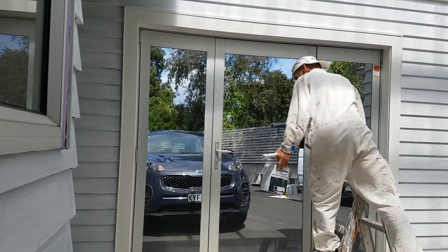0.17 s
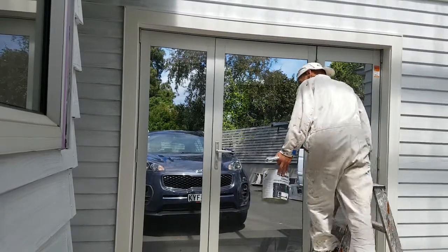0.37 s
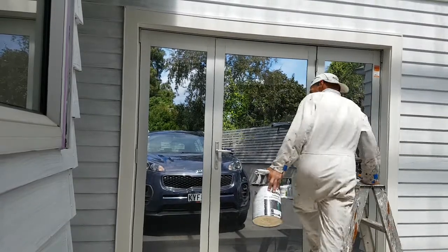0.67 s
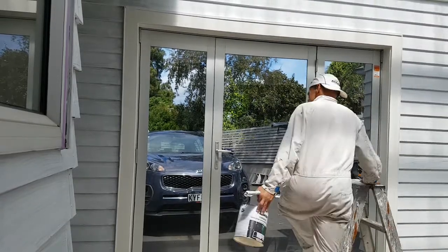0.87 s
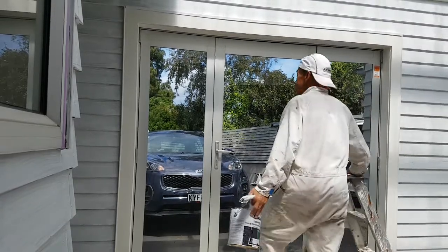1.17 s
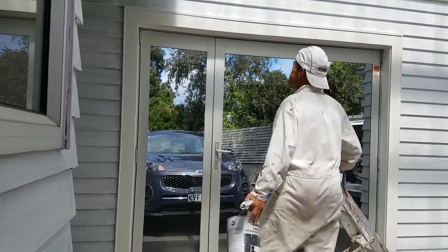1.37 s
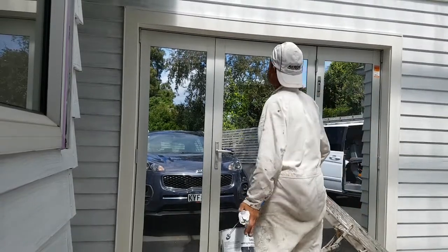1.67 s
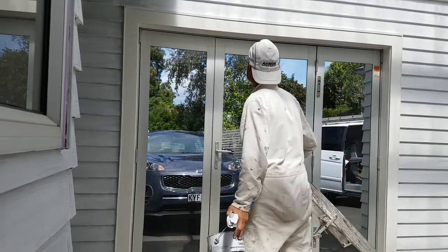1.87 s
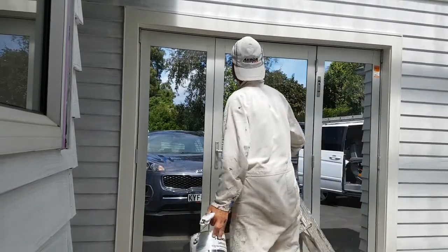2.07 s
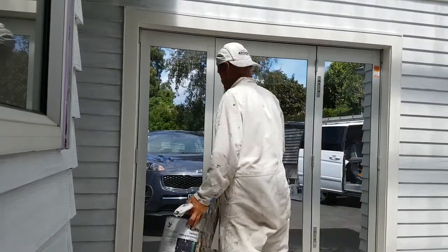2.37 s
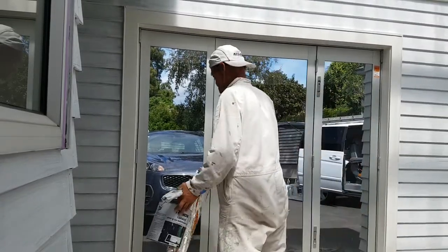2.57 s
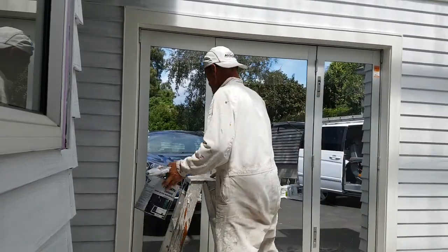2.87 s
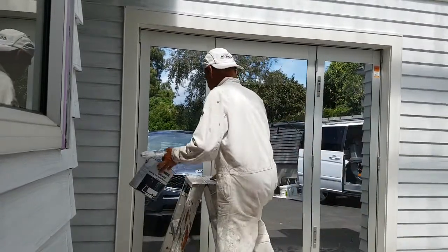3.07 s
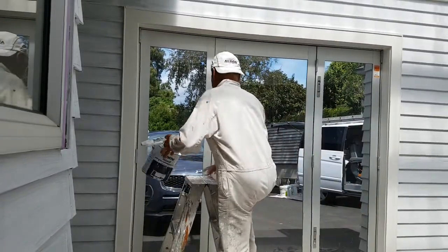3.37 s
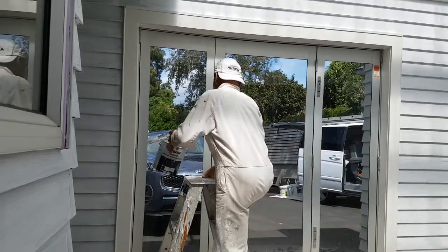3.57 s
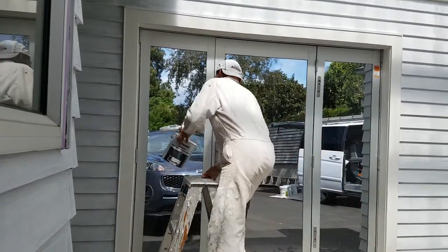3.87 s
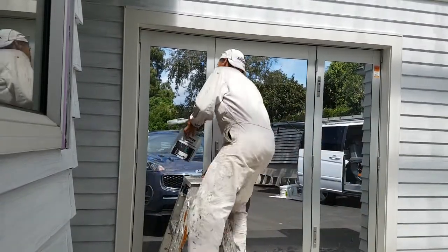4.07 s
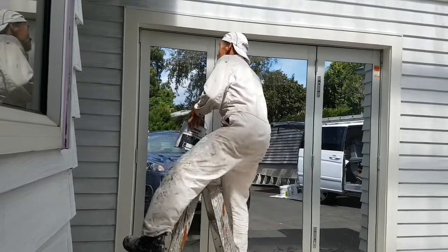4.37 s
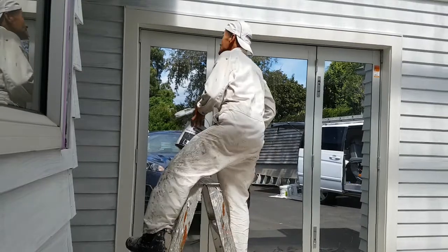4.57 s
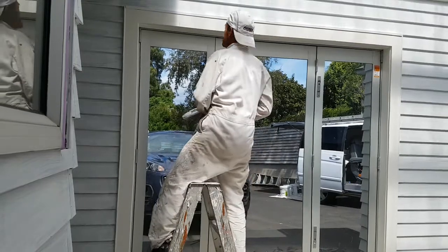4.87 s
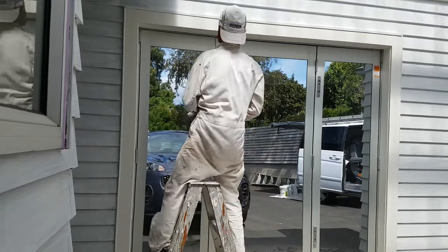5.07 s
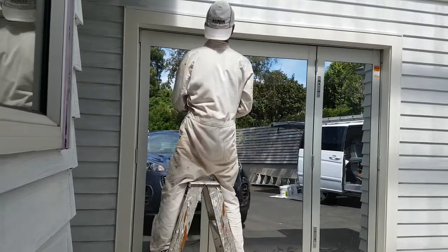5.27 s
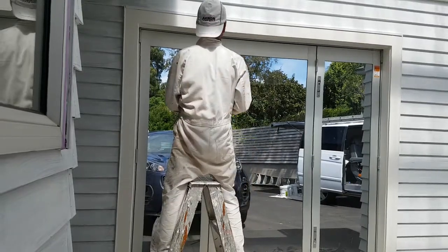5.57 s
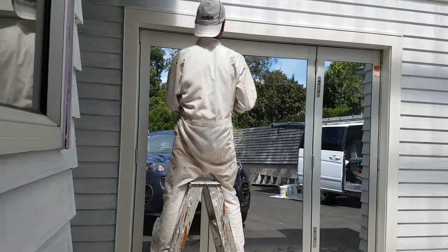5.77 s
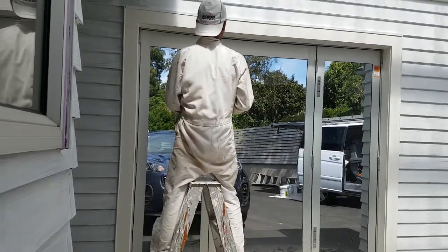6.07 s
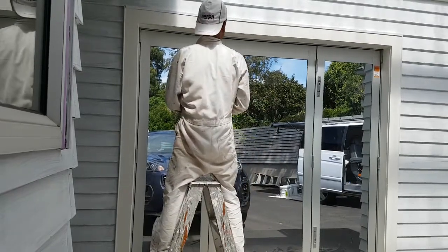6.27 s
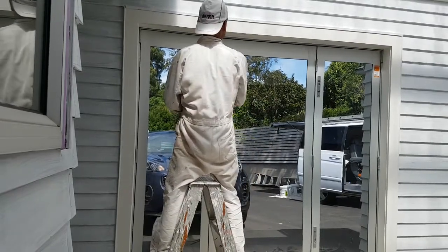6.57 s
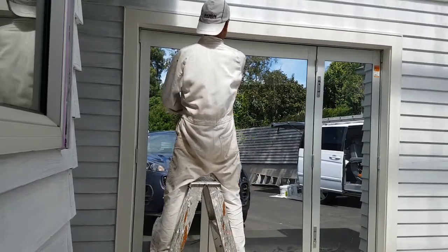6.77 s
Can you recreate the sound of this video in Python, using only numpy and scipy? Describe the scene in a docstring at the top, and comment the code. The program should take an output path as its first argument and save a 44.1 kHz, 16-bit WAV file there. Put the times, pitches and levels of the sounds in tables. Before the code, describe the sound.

Outside a house, a stepladder groans, rubs and knocks, lands with one loud sharp clack, then bumps lightly and gives a brief squeaky scrape.

```python
"""A groan of the loaded frame comes first, then rubs and bumps as a painter steps off a stepladder.
He drags it along a house wall and sets it down hard in a ringing paved yard, then climbs back on with light
knocks and dull bumps; a quick squealing scrape follows. A faint outdoor rumble and hiss lie underneath.
Blows excite decaying modes and a noisy clack, rubs are random tiny contacts, and squeaks are stick-slip
pulses; yard echoes place the sources around two differently coloured microphones."""
import sys
import numpy as np
from scipy import signal
from scipy.fft import rfft, irfft, next_fast_len
from scipy.io import wavfile

SR = 44100
rng = np.random.default_rng(int(sys.argv[2]) if len(sys.argv) > 2 else 0)


def wav_record(signal):
    """Record a signal, one row per channel, as 16-bit PCM in the file named by sys.argv[1]."""
    frames = np.transpose(np.atleast_2d(signal))
    bounded = np.clip(frames, -1, 1)
    # unit amplitude maps onto the largest positive 16-bit level
    quanta = np.round(bounded * 32767).astype(np.int16)
    wavfile.write(sys.argv[1], SR, quanta)


N = 304631
TIME = np.arange(N) / SR
CUTOFF_HZ = 15750  # top of the recorded band

# how alike the two microphones hear the yard: (frequency [Hz], left-right correlation [-1 to 1])
LEFT_RIGHT_LIKENESS = [(100, 0.93), (250, 0.89), (500, 0.6), (1000, 0.15), (2000, 0), (15000, 0)]


def from_db(db):
    """Decibels to gain."""
    return 10 ** (np.asarray(db) / 20)


def rms_one(x):
    """Scale to an rms of 1."""
    return x / np.sqrt(np.mean(x ** 2) + 1e-20)


def unit_energy(x):
    """Scale a response to an energy of 1 per channel."""
    return x / np.sqrt(np.sum(x ** 2, axis=-1, keepdims=True) + 1e-20)


def decay_60_db(t, t60):
    """Exponential decay that falls by 60 dB in t60 seconds."""
    return np.exp(-np.log(1000) * t / t60)


def at_hz(points, hz):
    """Read a table on a log-frequency axis."""
    table_hz, values = np.transpose(points)
    return np.interp(np.log(np.maximum(hz, 1)), np.log(table_hz), values)


def colour(x, spectrum):
    """Causal (minimum-phase) filter with the given dB spectrum."""
    size = next_fast_len(x.shape[-1] + SR // 10, True)
    gain = from_db(at_hz(spectrum, np.fft.rfftfreq(size, 1 / SR)))
    cepstrum = irfft(np.log(gain), size)
    # fold the cepstrum forward in time: the response then starts at once
    cepstrum[1:size // 2] *= 2
    cepstrum[size // 2 + 1:] = 0
    response = np.exp(rfft(cepstrum))
    return irfft(rfft(x, size) * response, size)[..., :x.shape[-1]]


def soften(x, hz):
    """One-pole low-pass: a softer contact loses its treble."""
    r = np.exp(-2 * np.pi * hz / SR)
    return signal.lfilter([1 - r], [1, -r], x + 1e-18)


def contact(x, bright_hz):
    """A soft contact dulls the treble gently at first, then more steeply."""
    return soften(soften(x, bright_hz), 4 * bright_hz)


def through(x, response):
    """Play a mono signal through a stereo response."""
    return signal.fftconvolve(x[None], response, axes=-1)[:, :N]


def add(out, s, x):
    """Mix x in from time s."""
    at = max(round(s * SR), 0)
    out[at:at + len(x)] += x[:N - at]


def stereo_noise(size):
    """White noise, alike in both channels in the bass and unrelated in the treble."""
    mid, side = rfft(rng.standard_normal((2, size)))
    alike = np.clip(at_hz(LEFT_RIGHT_LIKENESS, np.fft.rfftfreq(size, 1 / SR)), -1, 1)
    shared = np.sqrt((1 + alike) / 2) * mid
    opposed = np.sqrt((1 - alike) / 2) * side * [[1], [-1]]
    return irfft(shared + opposed, size)


def outdoors():
    """Steady airy hiss over the slowly changing rumble of a distant engine, both coloured noise."""
    # hiss of the open air: (frequency [Hz], relative level per Hz [dB])
    air_colour = [(15, -41), (25, -17), (40, -1), (62, -5.5), (110, -6), (160, -3.5), (300, -8.5),
                  (420, -11.5), (750, -13), (1600, -18.5), (2800, -22), (4500, -27), (7000, -21),
                  (9000, -28), (15500, -37)]
    # engine rumble: (frequency [Hz], relative level per Hz [dB])
    rumble_colour = [(25, -46), (52, -21), (67, -1.5), (88, -9.5), (200, -17.5), (600, -41), (3000, -72.5)]
    # rumble of the distant engine: (time [s], level [dB])
    rumble_levels = [(0, -57), (.9, -59.5), (1.8, -57), (2.6, -65), (4, -66.5), (6.9, -68.5)]
    air_db = -57.57
    size = next_fast_len(N, True)
    air = rms_one(colour(stereo_noise(size), air_colour))[:, :N]
    rumble = rms_one(colour(stereo_noise(size), rumble_colour))[:, :N]
    rumble_db = np.interp(TIME, *np.transpose(rumble_levels))
    return from_db(air_db) * air + from_db(rumble_db) * rumble


def yard(direct_db, early_db, early_s):
    """Direct sound, a burst of echoes off the near walls, then a tail with its own decay in each band."""
    # ringing of the yard: (frequency [Hz], time to fall by 60 dB [s])
    yard_t60 = [(100, 0.4), (300, 0.53), (600, 0.79), (1500, 0.63), (3500, 0.81), (6000, 0.67),
                (10000, 0.54), (15000, 0.27)]
    t, hz = TIME[:SR], np.fft.rfftfreq(SR, 1 / SR)
    noise, response = rfft(stereo_noise(SR)), 0
    echoes = (1 + from_db(early_db) * np.exp(-t / early_s)) * (1 - np.exp(-t / 0.00023))
    edges = np.geomspace(200, 17000, 25) - 160
    for low, high in zip(edges, edges[1:]):
        band = irfft(noise * ((hz >= low) & (hz < high)), SR)
        decay = decay_60_db(t, at_hz(yard_t60, np.sqrt(low * high)))
        response = response + np.sqrt(high - low) * unit_energy(band * decay * echoes)
    response = unit_energy(response)
    response[:, 0] += from_db(direct_db)  # the direct sound arrives first, against the echoes
    return unit_energy(response)


def grit(size, per_s, spread_db):
    """Random tiny contacts of uneven strength."""
    touches = rng.random(size) < per_s / SR
    strengths = from_db(spread_db * rng.standard_normal(size))
    return rms_one(touches * rng.choice([-1, 1], size) * strengths)


def rubs(strokes, per_s, spread_db):
    """Sliding surfaces catch many times a second, swelling and fading."""
    force, t = np.zeros(N), TIME[:SR // 2] - 1 / 4
    for s, half_s, db, bright_hz in strokes:
        stroke = grit(len(t), per_s, spread_db) * np.exp(-(t / half_s) ** 2)
        after_start = s + t >= 0
        add(force, s + t[0], from_db(db) * contact(stroke, bright_hz)[after_start])
    return force


def overalls():
    """Swishes of the overalls: dense fine contacts in the cloth, filtered to its colour."""
    # swishes: (middle time [s], half length [s], relative level [dB], brightness [Hz])
    swishes = [(.228, 0.031, -45, 11900), (.5, 0.039, -44, 5970), (.84, 0.035, -48.5, 9000),
               (2.05, 0.016, -46.5, 9000), (2.22, 0.038, -44, 4980), (3.555, 0.031, -39.5, 10200),
               (4.24, .03, -50, 5900), (4.61, 0.084, -46, 3020), (6.35, 0.047, -55.5, 5020),
               (6.72, 0.2, -58.5, 3980)]
    # colour of the cloth: (frequency [Hz], gain [dB])
    cloth_colour = [(300, -6), (1200, -5.5), (2500, 3.5), (5000, -1.5), (8000, -6.5), (15000, -17.5)]
    return colour(rubs(swishes, per_s=2500, spread_db=1), cloth_colour)


def groans(waver):
    """Slow stick-slip in the loaded frame: a wavering tone and its octave."""
    # groans: (time [s], length [s], pitch [Hz], relative level [dB], octave against the tone [dB])
    frame_groans = [(0, 0.151, 259.8, -48.5, -10), (0.456, 0.11, 401.3, -44, -4)]
    out = np.zeros(N)
    for s, length_s, hz, db, octave_db in frame_groans:
        wobble = rms_one(soften(rng.standard_normal(SR), 68))[:round(length_s * SR)]
        phase = 2 * np.pi * np.cumsum(hz * (1 + waver * wobble)) / SR
        tone = np.sin(phase) + from_db(octave_db) * np.sin(2 * phase)
        add(out, s, from_db(db) * rms_one(tone) * signal.windows.tukey(len(tone), 1 / 4))
    return out


def damped(hz, t60):
    """A quickly damped tone with a soft start."""
    t = TIME[:SR // 2]
    return np.sin(2 * np.pi * hz * t) * decay_60_db(t, t60) * (1 - np.exp(-t / 0.00093))


def click(fall_s):
    """The brief dull click of a contact: coloured noise dying away."""
    # dull click of a sole or foot: (frequency [Hz], relative level [dB])
    click_colour = [(60, -34.5), (200, -11.5), (800, 2), (1400, -2), (2500, -11.5), (3500, -28.5),
                    (8000, -38)]
    t = TIME[:SR // 2]
    return rms_one(colour(rng.standard_normal(len(t)), click_colour)) * np.exp(-t / fall_s)


def thud():
    """The low thud of weight settling: bass noise that rises softly and dies away."""
    # weight settling: (frequency [Hz], relative level [dB])
    thud_colour = [(30, -42.5), (70, -10), (120, 0), (200, -5), (280, 0.5), (450, -14.5), (2000, -59.5)]
    rise_s, fall_s = .012, .06
    t = TIME[:SR // 2]
    noise = rms_one(colour(rng.standard_normal(len(t)), thud_colour))
    return noise * (1 - np.exp(-t / rise_s)) * np.exp(-t / fall_s)


def bumps(click_s):
    """Each boot landing on a rung or the ground gives a damped tone, a dull click and a thud."""
    # landings: (time [s], relative level [dB], pitch [Hz], relative level of the low thud [dB])
    landings = [(.732, -24, 190, -36.5), (0.868, -28.5, 206, -45), (3.544, -28, 286, -46),
                (4.441, -41.5, 183, -57), (5.007, -29.5, 190, -48.5)]
    tone_t60_s, click_db = 0.038, -14.5  # click against the tone
    out = np.zeros(N)
    for s, db, hz, thud_db in landings:
        bump = damped(hz, tone_t60_s) + from_db(click_db) * click(click_s)
        add(out, s, from_db(db) * bump + from_db(thud_db) * thud())
    return out


def feet(click_s):
    """The ladder's feet ring briefly, with a click and a thud, each time they meet the paving."""
    # ring of the feet: (frequency [Hz], relative level [dB], time to fall by 60 dB [s])
    foot_modes = [(282.6, -24.5, 0.12), (451, -17.5, 0.25), (825, -16, 0.059), (1736, -6.5, 0.028)]
    # feet meeting the paving: (time [s], strength [dB], contact brightness [Hz])
    foot_hits = [(1.907, -22.5, 300), (2.982, 1.5, 5000), (5.883, -24.5, 394)]
    click_db, thud_db = -17, -50.5  # within each hit, before its strength
    out = np.zeros(N)
    ring = sum(from_db(db) * damped(hz, t60) for hz, db, t60 in foot_modes)
    for s, db, bright_hz in foot_hits:
        hit = ring + from_db(click_db) * click(click_s) + from_db(thud_db) * thud()
        add(out, s, from_db(db) * contact(hit, bright_hz))
    return out


def slips(slips_hz, uneven, jitter_hz, rolloff, grab_hz, grab_db, grab_bend):
    """Stick-slip pulses; a harder grip is louder and slips more slowly."""
    size = len(slips_hz)
    grip = rms_one(soften(soften(rng.standard_normal(SR), grab_hz), grab_hz))[-size:]
    jitter = rms_one(soften(rng.standard_normal(SR), jitter_hz))[-size:] - grab_bend * grip
    phase = 2 * np.pi * np.cumsum(slips_hz * (1 + uneven * jitter)) / SR
    orders = np.arange(1, 17)[:, None]
    weights = (orders * slips_hz < CUTOFF_HZ) / orders ** rolloff
    pulses = np.sum(weights * np.cos(orders * phase), axis=0)
    return rms_one(from_db(grab_db * grip) * pulses)


def scrape(grit_db, squeak_rolloff, rasp_rolloff):
    """Stick-slip squeaks that glide in pitch, over a gritty rasp that grows with the push and lets go."""
    # squeaks: (time [s], length [s], first slip rate [1/s], last slip rate [1/s], relative level [dB],
    #           unevenness [share of the slip rate])
    squeaks = [(5.062, 0.028, 1340, 2200, -43, 0.16), (5.108, 0.046, 5800, 5900, -50.5, .05),
               (5.143, .072, 1780, 2500, -49.5, 0.122), (5.219, 0.08, 4100, 4450, -43.5, .13),
               (5.278, .036, 2330, 2300, -35, 0.107), (5.306, .06, 2600, 5400, -36, 0.294),
               (5.361, .066, 6850, 7600, -32, 0.026), (5.419, .05, 2100, 1350, -32, 0.203)]
    # colour of the scrape: (frequency [Hz], gain [dB])
    scrape_colour = [(200, -9), (500, -10), (1000, -7.5), (2000, 1), (2700, -0.5), (4000, 1.5), (7300, -1),
                     (9000, -6.5), (14000, -3), (16000, -14)]
    squeak_fade = 0.29  # share of a squeak spent swelling and fading
    start_s, peak_s, end_s = 5.068, 5.5, 5.57  # the rasp
    peak_db, growth_db_per_s, fall_db_per_s = -37, 28.5, 39  # peak level before colouring
    rasp_slips_per_s, rasp_uneven = 1300, .7
    surface = dict(jitter_hz=2500, grab_hz=110, grab_db=4, grab_bend=.3)

    out = np.zeros(N)
    for s, length_s, first_hz, last_hz, db, uneven in squeaks:
        glide = np.geomspace(first_hz, last_hz, round(length_s * SR))
        swell = signal.windows.tukey(len(glide), squeak_fade)
        add(out, s, from_db(db) * swell * slips(glide, uneven, rolloff=squeak_rolloff, **surface))

    t = np.arange(start_s, end_s, 1 / SR) - peak_s
    push_db = peak_db + np.minimum(growth_db_per_s * t, -fall_db_per_s * t)
    push = from_db(push_db) * signal.windows.tukey(len(t), 1 / 20)
    rasp = slips(np.full(len(t), rasp_slips_per_s), rasp_uneven, rolloff=rasp_rolloff, **surface)
    rough = from_db(grit_db) * grit(len(t), per_s=1200, spread_db=0)
    add(out, start_s, push * (rasp + rough))
    return colour(out, scrape_colour)


def ladder_body(ring_db):
    """The lasting ring of the ladder: decaying sines, one for each mode."""
    # ring of the ladder: (frequency [Hz], relative level [dB], time to fall by 60 dB [s])
    ladder_modes = [(293, -7, 0.54), (448.6, 2, 0.48), (514, -7, 0.2), (623.4, -6.5, 0.67),
                    (822, -11, 0.31), (916, -3.5, 0.64), (976, -2.5, 0.53), (1067, -9, 0.1175),
                    (1258, -4, 0.46), (1420, -7.5, 0.87), (1702, 0, 0.261), (1752, -4.5, 0.36),
                    (1834, -5, 0.6), (1849, 0.5, 0.5), (1954, 3, 0.248), (1993, 3.5, 0.16),
                    (2108, -2, 0.41), (2110, -5.5, 0.69), (2450, -8, .58), (2530, -14.5, 0.17),
                    (3065, -6.5, 0.63), (2929, -7.5, 0.4), (3140, -11.5, 0.39), (3267, -7, 0.71),
                    (3630, -12, 0.88), (3817, -11, .5)]
    t, ring = TIME[:SR], 0
    for hz, db, t60 in ladder_modes:
        # higher modes reach the two microphones out of step
        alike = np.clip(at_hz(LEFT_RIGHT_LIKENESS, hz), -1, 1)
        apart = np.arccos(alike) / 2 * rng.choice([-1, 1])
        phase = 2 * np.pi * (hz * t + rng.random()) + apart * np.array([[1], [-1]])
        ring = ring + from_db(db) * np.sin(phase) * decay_60_db(t, t60)
    return from_db(ring_db) * unit_energy(ring * (1 - np.exp(-t / .003)))


def clack():
    """The broad clack of the frame heard across the yard; no two spots on the frame sound quite alike."""
    # short clack of the frame: (frequency [Hz], relative level per Hz [dB])
    clack_colour = [(60, -24), (130, -19), (200, -15.5), (280, -10.5), (365, -6), (460, 0), (700, -4.5),
                    (1000, -0.5), (1800, -0.5), (2450, -4), (3300, -2.5), (4400, -10), (6500, -9),
                    (9000, -15), (15000, -15)]
    return unit_energy(colour(yard(direct_db=-8, early_db=-4.5, early_s=0.0165), clack_colour))


def knocks(ring, count):
    """Blows land on a few spots in turn; the duller the contact, the longer the loose joints take to carry it."""
    # blows on the ladder: (time [s], strength [dB], contact brightness [Hz])
    blows = [(.82, -9.5, 2420), (1.054, -5.5, 2450), (1.137, 3, 1310), (1.36, -11.5, 1460),
             (1.735, -5, 1330), (1.794, -2.5, 393), (1.967, -14, 2980), (2.827, -8.5, 597),
             (2.9745, 6.5, 3530), (2.98, 16.5, 8750), (2.996, 20, 3720), (3.024, 10, 4020),
             (3.056, -4, 4000), (3.526, -0.5, 700), (3.541, 1.5, 730), (4.195, -14, 2516),
             (4.909, -9.5, 2530), (4.955, -12.5, 1210), (5.007, -6.5, 600), (5.256, -4.5, 800),
             (5.295, -9, 1000), (5.436, -0.5, 1300), (5.883, -21.5, 855)]
    build_1k_s, build_law = .004, 0.63  # build-up at 1 kHz brightness; power by which brighter blows build faster
    out, t = np.zeros((2, N)), TIME[:SR]
    spots = [clack() for _ in range(count)]
    for k, (s, db, bright_hz) in enumerate(blows):
        build_s = build_1k_s * (10 ** 3 / bright_hz) ** build_law
        response = (spots[k % count] + ring) * (1 - np.exp(-t / build_s))
        blow = from_db(db) * contact(response, bright_hz)
        add(out[0], s, blow[0])
        add(out[1], s, blow[1])
    return out


def ladder_sounds():
    """Knocks and rubs excite the clack and the lasting ring of one ladder."""
    # feet and frame rubbing: (middle time [s], half length [s], relative level [dB], contact brightness [Hz])
    ladder_rubs = [(.228, 0.023, -47.5, 3500), (.288, 0.031, -46.5, 1310), (.491, 0.043, -39, 1320),
                   (.63, 0.087, -47, 1280), (.987, 0.072, -42, 1160), (1.112, 0.02, -30, 770),
                   (1.18, 0.017, -30.5, 1120), (1.44, 0.061, -49, 1000), (1.745, 0.047, -39, 1320),
                   (2.031, 0.13, -47, 810), (2.34, .033, -56, 2546), (3.56, .012, -21.5, 504),
                   (4.16, 0.026, -51.5, 1473), (4.45, 0.043, -50, 1490), (5.485, 0.06, -32.5, 1680),
                   (6.885, 0.043, -50, 4040)]
    ring = ladder_body(ring_db=-5.5)
    rubbing = rubs(ladder_rubs, per_s=550, spread_db=4.5)
    rubbed = through(rubbing, clack() + from_db(0.5) * ring)
    return from_db(1.65) * (knocks(ring, count=5) + rubbed)


def scene():
    """Ladder, bumps, cloth and scrape in the yard, over the outdoor background."""
    near = yard(direct_db=9, early_db=0, early_s=.015)
    low = through(groans(waver=0.056) + bumps(click_s=0.011) + feet(click_s=.012), near)
    squeal = scrape(grit_db=-5, squeak_rolloff=0.96, rasp_rolloff=0.16)
    # less direct sound: these seem farther from the microphones
    far = yard(direct_db=-5.5, early_db=2.0, early_s=0.031)
    high = through(overalls() + squeal, far)
    return outdoors() + low + high + ladder_sounds()


def record(dry):
    """Each microphone adds its colour; the highest peaks are rounded and the top is cut."""
    # colour of each microphone: (frequency [Hz], gain [dB])
    left_mic = [(500, 0.4), (2000, -1.7), (6000, -1), (7800, 2.5), (9000, 1.5), (11000, 2), (15000, 2.5)]
    right_mic = [(500, 0.5), (2000, 2), (6000, 3), (7800, -4), (9000, -11), (11000, -5.5), (15000, 2)]
    peak_limit = .92  # ceiling of the rounding, ahead of the top cut
    heard = np.array([colour(dry[0], left_mic), colour(dry[1], right_mic)])
    heard = heard / (1 + (heard / peak_limit) ** 10) ** (1 / 10)
    top_cut = signal.ellip(12, .1, 80, CUTOFF_HZ, fs=SR, output="sos")
    return signal.sosfilt(top_cut, heard)


dry = scene()
out = record(dry)
wav_record(out)
```